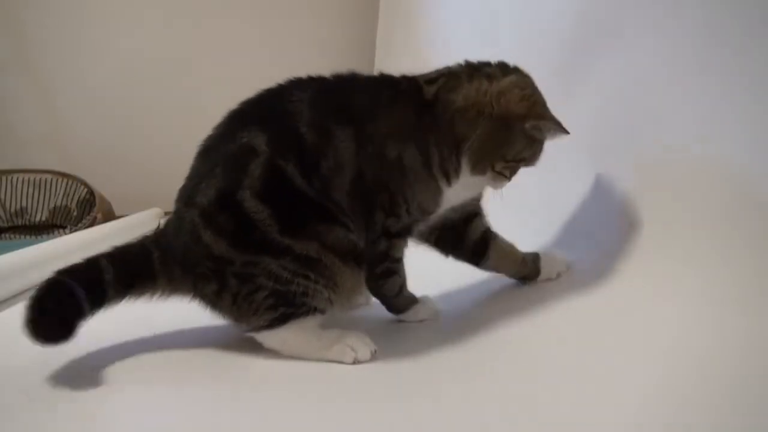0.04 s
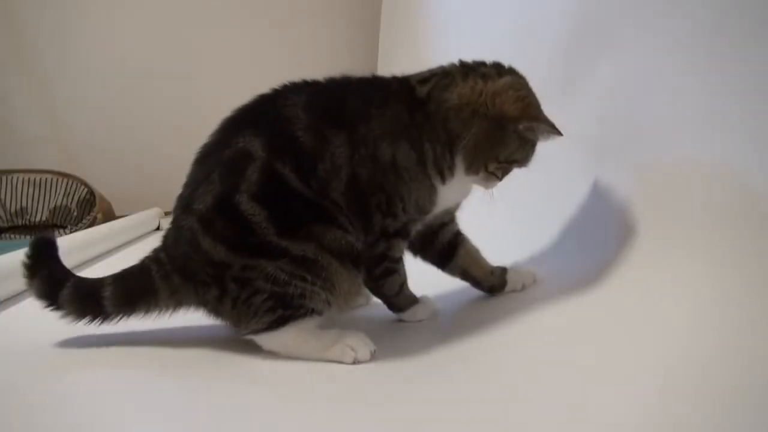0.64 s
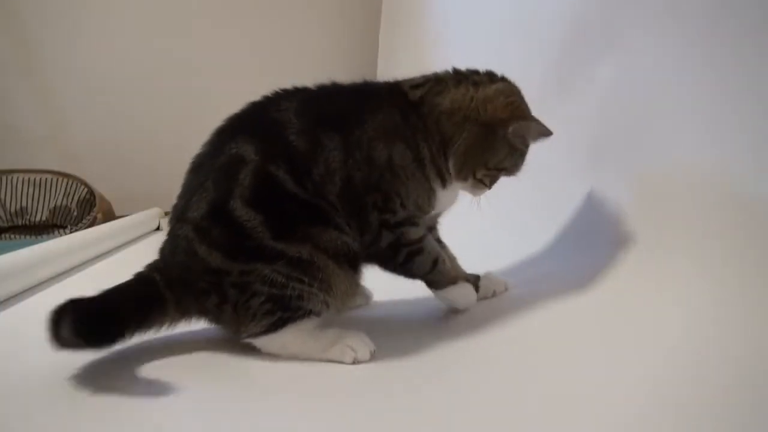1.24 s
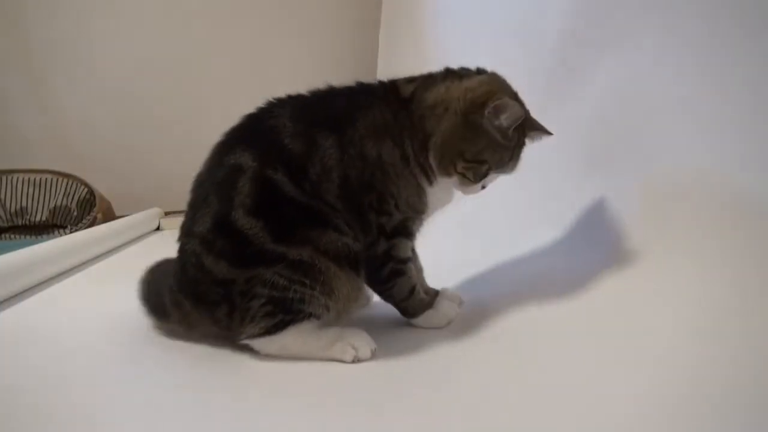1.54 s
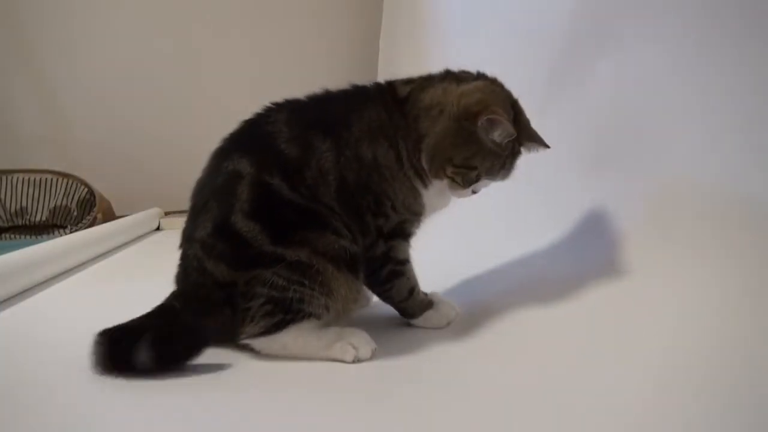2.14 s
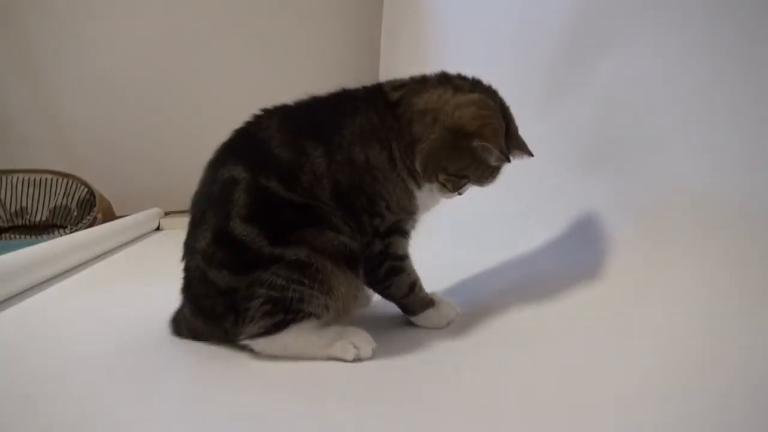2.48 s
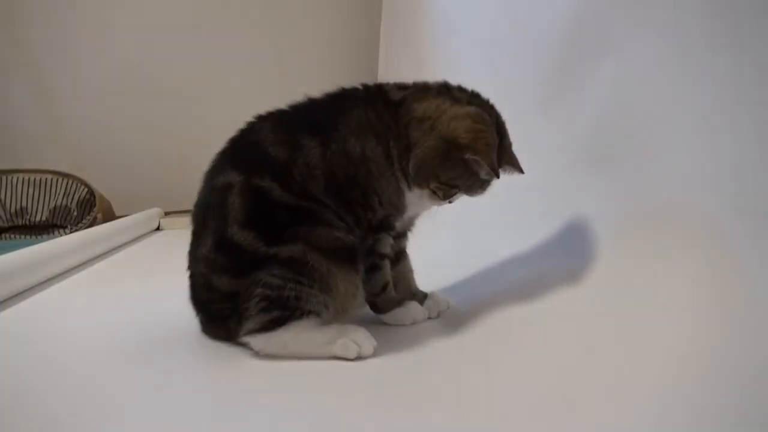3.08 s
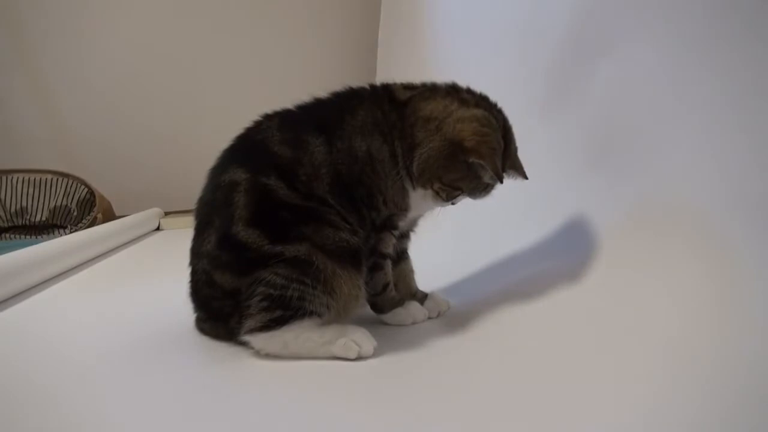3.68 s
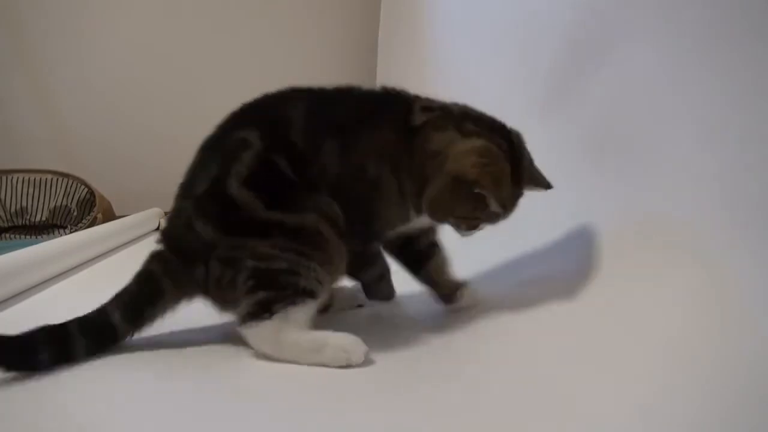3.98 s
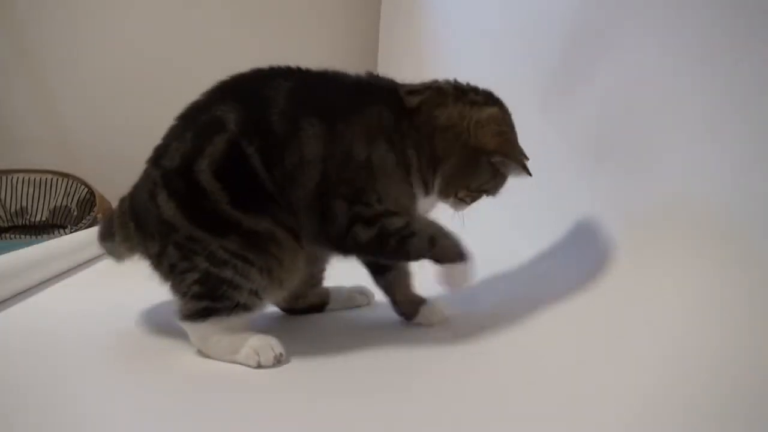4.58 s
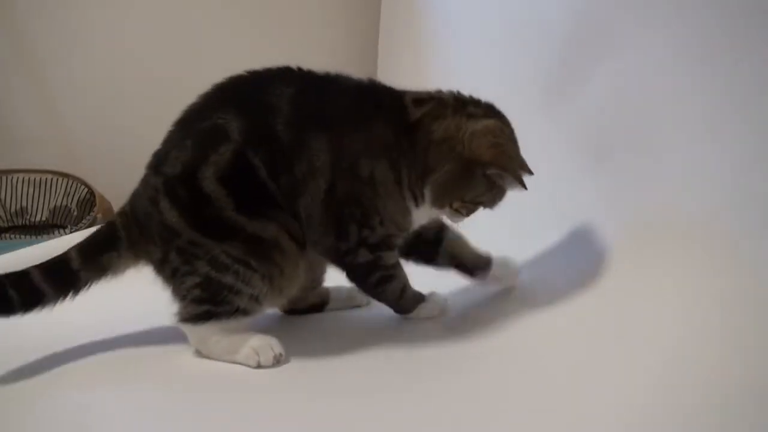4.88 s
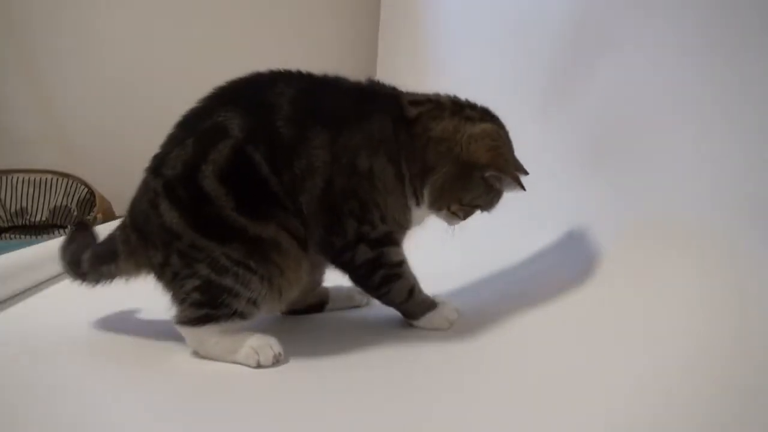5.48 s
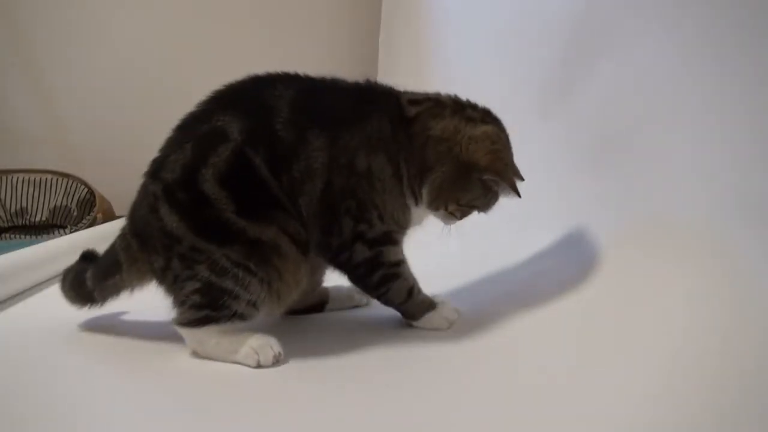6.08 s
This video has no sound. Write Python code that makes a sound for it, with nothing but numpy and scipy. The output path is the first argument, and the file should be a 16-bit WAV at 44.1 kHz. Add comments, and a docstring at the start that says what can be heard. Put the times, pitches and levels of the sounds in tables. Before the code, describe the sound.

Stiff paper rustles, flutters and pops in uneven bursts under a cat's paws, with a quiet lull before a louder flurry.

```python
"""Cat on backdrop paper

A cat paws at a large sheet of paper in a small, bare room. Paws and tail slide with a grainy hiss;
when shoved, the stiff sheet flutters, buckles with hollow pops and pushes out puffs of air.
Footfalls thud softly. The room rings for about half a second over a faint, steady fan hum."""
import sys
import numpy as np
from scipy import signal
from scipy.fft import rfft, irfft, next_fast_len
from scipy.io import wavfile

SR = 44100
rng = np.random.default_rng(int(sys.argv[2]) if len(sys.argv) > 2 else 0)


def store_wav(level_fs):
    """Save 16-bit WAV to argv[1]."""
    pcm = np.round(np.clip(np.atleast_2d(level_fs), -1, 1) * 32767)
    wavfile.write(sys.argv[1], SR, pcm.T.astype(np.int16))


N = 279153
PAN = np.array([[.5], [-.5]])  # splits a left-minus-right level between the channels

# the ring of the sheet (frequency [Hz], level [dB])
SHEET_EQ = [(50, -35), (100, -7.5), (150, -27.5), (195, -8), (290, -5.5), (400, -2), (520, -5.5), (740, 0),
            (1060, -4), (1550, -8.5), (2000, -7.5), (2330, -8), (2700, -15.5), (6000, -28), (12000, -46.5)]
# buckle cues (time [s], thump [dB], pop [dB], snap [dB], base settling time [s]); the last row is the sharp
# catch that starts the closing scrape
BUCKLE_CUES = [(.009, -39, -24, -39, 0.0033), (0.1602, -22.5, -15, -24.5, 0.0012),
               (.631, -51, -38.5, -41, 0.0038), (1.522, -21.5, -23, -50, 0.0031),
               (1.5475, -28, -15, -32, 0.004), (1.594, -19, -17, -40, 0.0021),
               (2.061, -55, -36.5, -47, 0.0035), (3.96, -49, -46.5, -55, 0.0028),
               (3.9856, -30.5, -23.5, -46, 0.0027), (4.0415, -17.5, -12.5, -22, 0.0062),
               (4.06, -21, -12, -20, 0.013), (4.14, -17, -17.5, -23, 0.0072),
               (4.2284, -19, -12, -21, 0.0047), (4.292, -15.5, -13, -18.5, 0.0086),
               (4.4726, -17, -13, -22, 0.0026), (4.534, -20, -17, -27, 0.0047),
               (4.5796, -39, -12, -26.5, 0.0048), (4.686, -21.5, -20, -49, 0.0017),
               (4.775, -21.5, -21, -22, 0.0019), (4.792, -26.5, -23, -38, 0.0021),
               (4.882, -37, -26, -33, 0.0035), (5.035, -28.5, -22.5, -38, 0.0045),
               (5.0414, -18.5, -16.5, -39, 0.0036), (5.5, -22.5, -18, -46, 0.0034),
               (5.565, -39, -31, -34.5, 0.0046), (6.305, -32.5, -45, -27, 0.0038)]
def buckles():
    """The sheet snaps through: a brief bright snap, a hollow pop and a slower thump."""
    out, sheet = np.zeros((2, N)), ring_of(SHEET_EQ)
    for start, thump_db, pop_db, snap_db, life in BUCKLE_CUES:
        thump = amp(thump_db) * impact(sheet, lo_hz=154, hi_hz=479, life=1.48 * life, scatter_db=7.5)
        pop = amp(pop_db) * impact(sheet, lo_hz=454, hi_hz=1740, life=life, scatter_db=9)
        snap = amp(snap_db) * impact(sheet, lo_hz=2550, hi_hz=7440, life=0.75 * life, scatter_db=29)
        add(out, start, in_room(thump + pop + snap, wet_db=-3.5))
    return out


# bright fur hiss (frequency [Hz], level [dB])
FUR_EQ = [(500, -28), (2000, -26), (3500, -1), (5200, 2.5), (6600, -0.5), (8000, -6), (10000, -16),
          (12000, -16.5), (14000, -69)]
# midrange pad scrape (frequency [Hz], level [dB])
PAD_EQ = [(60, -29), (150, -12.5), (300, 2), (600, -5), (1200, 3), (2300, 0), (3000, -5), (4500, -12),
          (8000, -28.5), (14000, -64)]
# paw strokes (time [s], attack [s], hold [s], fur [dB], pads [dB], flutter [dB])
STROKE_CUES = [ (0.0, 0.0013, 0.027, -31, -20, -19.5), (0.07, 0.02, 0.033, -36.5, -29.5, -52),
               (0.16, 0.0097, 0.014, -45, -24.5, -24.5), (0.63, 0.035, 0.023, -45, -33, -41),
               (0.72, 0.011, 0.0086, -60, -62, -42), (0.93, 0.048, 0.037, -46.5, -36, -45),
               (1.21, 0.06, 0.16, -63.5, -54, -65), (1.39, 0.09, 0.023, -42.5, -39.5, -49),
               (1.52, 0.022, 0.042, -47, -37, -36), (2.0, 0.077, 0.019, -48.5, -41.5, -58),
               (3.38, .14, 0.089, -58.5, -52.5, -76), (3.62, 0.058, 0.074, -57, -49.5, -74),
               (3.96, 0.021, .01, -45.5, -45, -55), (4.043, 0.042, 0.018, -29, -17.5, -16),
               (4.12, 0.011, 0.0055, -23.5, -22.5, -21), (4.228, 0.026, 0.035, -34.5, -20, -20),
               (4.29, 0.054, 0.027, -30, -17.5, -19), (4.472, 0.022, 0.053, -33.5, -24, -30.5),
               (4.55, 0.035, 0.0089, -35, -24, -23.5), (4.63, 0.079, .015, -33, -25, -39),
               (4.776, 0.018, .015, -41, -27.5, -30), (4.83, 0.027, 0.024, -37.5, -28, -35.5),
               (5.04, 0.032, 0.065, -51.5, -43.5, -37.5), (5.42, 0.046, 0.063, -45.5, -37.5, -57),
               (5.52, 0.049, 0.016, -37.5, -32.5, -36), (5.8, 0.11, .1, -65, -66, -79),
               (6.288, 0.035, .03, -34, -30, -34.5), ]
def paw_slides():
    """Fur brushes the paper finely; pads and claws catch on it more coarsely."""
    fur = coloured(crackle(per_s=2200, spread_db=2.5, wet_db=4.5, smooth_db=-2.5), FUR_EQ)
    pads = coloured(crackle(per_s=650, spread_db=0.5, wet_db=0.5, smooth_db=1), PAD_EQ)
    fur *= envelope(STROKE_CUES, release_db_per_s=173, column=3)
    pads *= envelope(STROKE_CUES, release_db_per_s=147.5, column=4)
    return fur + pads


# dark paper flutter (frequency [Hz], level [dB])
FLUTTER_EQ = [(40, -64), (80, -17.5), (140, -5.5), (200, -2), (290, 9), (460, -6.5), (750, 5.5),
              (1150, -5.5), (1600, -7), (3000, -61), (8000, -73)]
def sheet_flutter():
    """Each stroke sends a run of small, low flexes through the sheet."""
    flexes = coloured(crackle(per_s=400, spread_db=3, wet_db=-0.5, smooth_db=1.5), FLUTTER_EQ)
    return flexes * envelope(STROKE_CUES, release_db_per_s=133, column=5)


# a paw on the papered floor (frequency [Hz], level [dB])
FOOT_EQ = [(50, -25), (110, -22.5), (175, -1.5), (250, 0), (380, 1.5), (580, -18), (760, -8.5),
           (1000, -15.5), (1600, -19), (4000, -68)]
# footfall cues (time [s], thud [dB], knock [dB], thud centre [Hz])
FOOT_CUES = [(0.723, -29, -32.5, 303), (1.474, -29, -41, 278), (2.026, -53, -45, 250),
             (2.945, -44, -51, 206), (2.967, -33, -31, 173), (4.582, -32.5, -21.5, 85),
             (4.78, -20.5, -27, 296), (5.041, -36.5, -39, 80), (5.477, -32.5, -34, 293)]
def footfalls():
    """A padded paw presses the paper to the floor with a dull thud."""
    out, foot = np.zeros((2, N)), ring_of(FOOT_EQ)
    for start, thud_db, knock_db, hz in FOOT_CUES:
        thud = amp(thud_db) * impact(foot, lo_hz=0.69 * hz, hi_hz=1.48 * hz, life=0.011, scatter_db=-7)
        knock = amp(knock_db) * impact(foot, lo_hz=380, hi_hz=1120, life=0.0067, scatter_db=-5)
        add(out, start, in_room(thud + knock, wet_db=-4))
    return out


# airy tail swish (frequency [Hz], level [dB])
TAIL_EQ = [(100, -17), (300, 1), (1000, -3.5), (2600, -7.5), (4000, -3), (5500, 1), (7500, -2.5),
           (10000, -12.5), (12500, -13.5), (14000, -29)]
# tail sweeps (time [s], attack [s], hold [s], level [dB])
TAIL_CUES = [(2.27, 0.079, .045, -51.5), (2.595, 0.035, 0.049, -44), (2.92, 0.041, .005, -47.5),
             (3.02, 0.02, .006, -44.5)]
def tail_swishes(left_db=3.5):
    """Long fur sweeps the paper with a thin hiss, left of centre."""
    hairs = coloured(crackle(per_s=5100, spread_db=2.5, wet_db=4, smooth_db=2), TAIL_EQ)
    return hairs * envelope(TAIL_CUES, release_db_per_s=135, column=3) * amp(PAN * left_db)


# air pushed out by the sheet (time [s], level before panning [dB])
PUFF_CUES = [(1.548, -61), (4.044, -46), (4.235, -51), (4.58, -49), (5.036, -39)]
def air_puffs(pulse_hz=38, decay_s=0.0029):
    """A puff of air reaches the two microphone ports as opposite low pressure swings."""
    out, t = np.zeros((2, N)), np.arange(SR // 8) / SR
    puff = unit(np.sin(2 * np.pi * pulse_hz * t) * t * np.exp(-t / decay_s))
    for start, db in PUFF_CUES:
        add(out, start, amp(db) * puff * np.array([[.8], [-.35]]))
    return out


# the room's decay (frequency [Hz], time to fall 60 dB [s])
REVERB_TIMES = [(100, 0.37), (260, 0.44), (700, 0.46), (1500, 0.49), (2100, 0.4), (4850, 0.25),
                (12000, 0.26)]
def in_room(dry, wet_db, build_s=0.0046):
    """The direct sound plus a stereo reverb in which each frequency dies at its own speed."""
    hz, t, spectra = signal.stft(diffuse(SR // 2), SR, nperseg=256)
    decay = amp(-60 * t / along(REVERB_TIMES, hz)[:, None])
    reverb = signal.istft(spectra * decay, SR, nperseg=256)[1]
    reverb *= 1 - np.exp(-(np.arange(reverb.shape[1]) / SR / build_s) ** 2)
    reverb /= np.sqrt(np.sum(reverb ** 2) / 2)
    dry = np.atleast_2d(dry)
    out = signal.fftconvolve(dry.mean(axis=0)[None], amp(wet_db) * reverb, axes=1)
    out[:, :dry.shape[1]] += dry
    return out


# fan partials (frequency [Hz], level [dB])
FAN_TONES = [(242, -66.5), (382, -67), (543.5, -60.5), (667.5, -69), (721, -68), (780.5, -65)]
# room air (frequency [Hz], level [dB])
AIR_EQ = [(25, -36), (52, -41), (72, -18), (95, -12), (120, -15), (160, -22), (230, -8), (380, -6.5),
          (450, -9.5), (560, -6), (800, -7), (1220, -15.5), (2200, -19), (14000, -36.5)]
# stereo image of the air (frequency [Hz], left-right correlation [0-1])
AIR_IMAGE = [(60, 0.34), (130, 0.72), (280, 1), (610, 0.69), (1330, 0.15), (2900, 0.052), (6200, 0.39),
             (13500, 0.81)]
# the room tone leans left (frequency [Hz], left minus right [dB])
ROOM_TONE_PAN = [(110, 1), (370, 4), (670, 7), (2200, 3.5), (7400, 4.5), (13500, -1.5)]
def room_tone(air_db=-51.5):
    """Room air and the slightly unsteady hum of a fan off to the left."""
    t, hum = np.arange(N) / SR, np.zeros(N)
    for hz, db in FAN_TONES:
        phase = 2 * np.pi * (hz * t + rng.random())
        drift = np.cumsum(rng.normal(0, 0.0123, N))
        hum += amp(db) * np.sqrt(2) * np.sin(phase + drift)
    air = amp(air_db) * coloured(diffuse(N, AIR_IMAGE), AIR_EQ)
    return filtered(air + hum, lambda hz: amp(PAN * along(ROOM_TONE_PAN, hz)))


# stereo image of diffuse sound (frequency [Hz], left-right correlation [0-1])
DIFFUSE_IMAGE = [(60, 0.39), (150, 0.93), (300, 0.8), (700, 0.46), (1500, 0.18), (4000, 0.54), (8000, 0.49),
                 (12000, 1)]
def diffuse(size, image=DIFFUSE_IMAGE):
    """White stereo noise as it arrives from all sides."""
    def mid_side_gains(hz):
        angle = np.arccos(np.clip(along(image, hz), -1, 1)) / 2
        return np.array([np.cos(angle), np.sin(angle)])
    mid, side = filtered(rng.standard_normal((2, size)), mid_side_gains)
    return np.array([mid + side, mid - side])


def impact(body, lo_hz, hi_hz, life, scatter_db):
    """One band of a hit: a kick, then waves from folds and edges; rms 1 over its first 12 ms."""
    t = np.arange(len(body)) / SR
    waves = diffuse(len(t)) * np.exp(-(t / (2.14 * life)) ** 2)
    waves *= amp(scatter_db) / np.linalg.norm(waves[0])
    waves[:, 0] += 1  # the kick
    struck = signal.fftconvolve(waves, body[None], axes=1)[:, :len(t)]
    band = signal.butter(2, [lo_hz, hi_hz], "band", fs=SR)
    ring = signal.lfilter(*band, struck)
    return ring / np.sqrt(np.mean(ring[:, t < .012] ** 2, axis=1, keepdims=True))


def crackle(per_s, spread_db, wet_db, smooth_db):
    """Tiny slips of uneven size in the wash of their own echoes, over smooth noise."""
    sizes = amp(spread_db * np.minimum(rng.standard_exponential(N), 4))
    signs = rng.choice([-1, 1], N)
    slips = sizes * signs * (rng.random(N) < per_s / SR)
    return unit(in_room(slips, wet_db)[:, :N]) + amp(smooth_db) * diffuse(N)


def envelope(cues, release_db_per_s, column):
    """Gain for one level column: each motion speeds up, holds, then dies away; overlaps add in power."""
    t, power = np.arange(N) / SR, np.zeros(N)
    for cue in cues:
        start, attack, hold = cue[:3]
        speed = np.clip((t - start) / attack, 0, 1)
        since_stop = np.maximum(t - start - attack - hold, 0)
        power += (speed * amp(cue[column] - release_db_per_s * since_stop)) ** 2
    return np.sqrt(power)


def ring_of(eq, size=2048):
    """The minimum-phase impulse response of an EQ curve."""
    gains = amp(along(eq, np.fft.rfftfreq(size, 1 / SR)))
    cepstrum = irfft(np.log(gains))
    cepstrum[1:size // 2] *= 2
    cepstrum[size // 2 + 1:] = 0
    return irfft(np.exp(rfft(cepstrum)))


def coloured(x, eq):
    """x through an EQ curve, at rms 1."""
    return unit(filtered(x, lambda hz: amp(along(eq, hz))))


def filtered(x, response):
    """x through a frequency response."""
    n = x.shape[-1]
    padded = next_fast_len(n + 8192)
    gains = response(np.fft.rfftfreq(padded, 1 / SR))
    return irfft(rfft(x, padded) * gains, padded)[..., :n]


def along(curve, hz):
    """Read a curve on a log frequency axis."""
    freqs, values = np.transpose(curve)
    return np.interp(np.log(hz + 1), np.log(freqs + 1), values)


def amp(db):
    """Decibels to gain."""
    return 10 ** (np.asarray(db) / 20)


def unit(x):
    """Scale to rms 1."""
    return x / np.sqrt(np.mean(x ** 2) + 1e-20)


def add(out, start, sound):
    """Mix a sound in at start seconds."""
    rest = out[:, round(start * SR):]
    rest[:, :sound.shape[1]] += sound[:, :rest.shape[1]]


# where the cat works the sheet (time [s], left minus right [dB])
PAW_PAN = [(0, 4), (1, 1.3), (1.6, 1.5), (2.1, 4), (3.6, 1), (4.2, 1.8), (4.8, 2), (5.5, 1.8), (6.3, 0)]
def scene():
    """The mix: paper sounds pan with the paws, over tail, puffs and room tone."""
    left_db = np.interp(np.arange(N) / SR, *np.transpose(PAW_PAN))
    paper = (paw_slides() + sheet_flutter() + buckles() + footfalls()) * amp(PAN * left_db)
    return paper + tail_swishes() + air_puffs() + room_tone()


def record(dry, top_hz=14200):
    """The master: hard clipping at full scale, then a brick-wall high cut."""
    return filtered(np.clip(dry, -1, 1), lambda hz: hz < top_hz)


dry = scene()
out = record(dry)
store_wav(out)
```